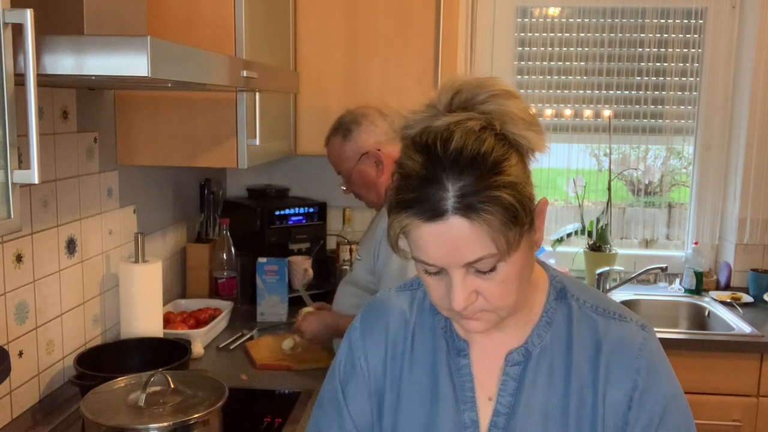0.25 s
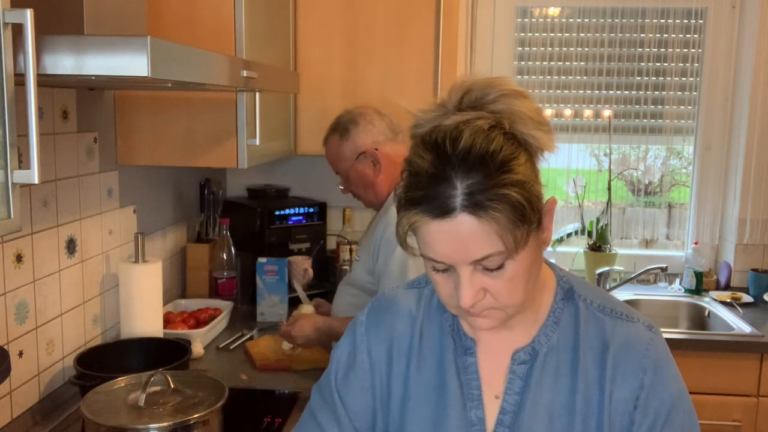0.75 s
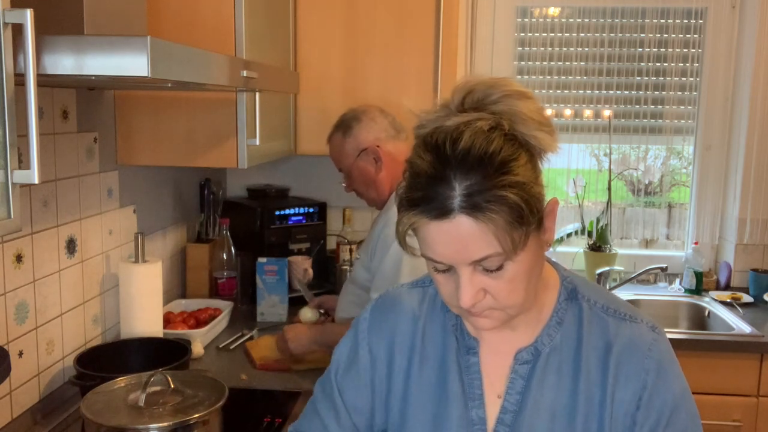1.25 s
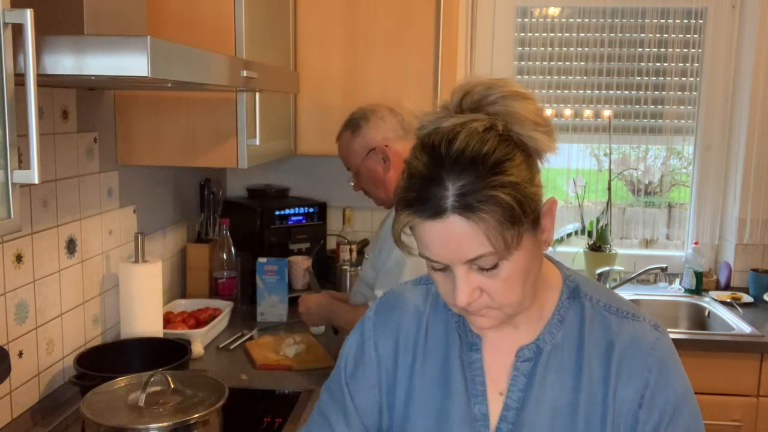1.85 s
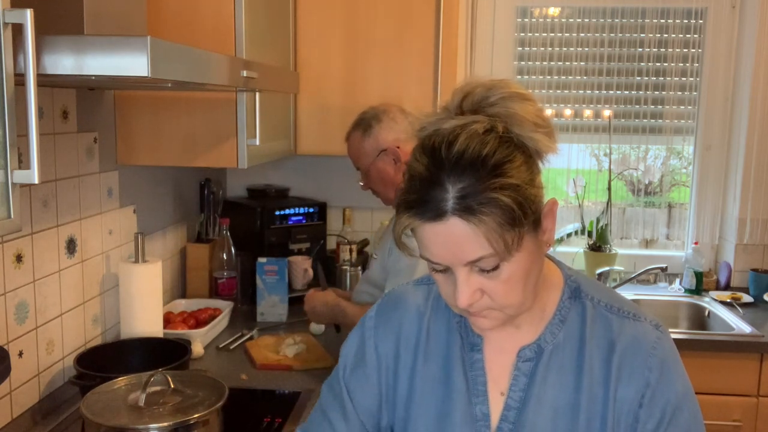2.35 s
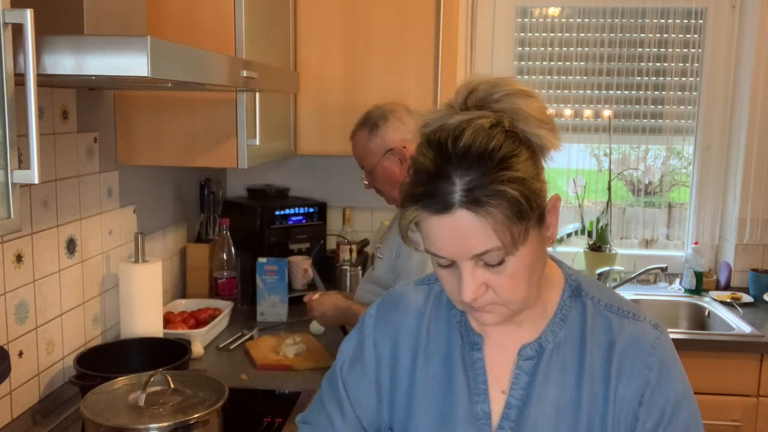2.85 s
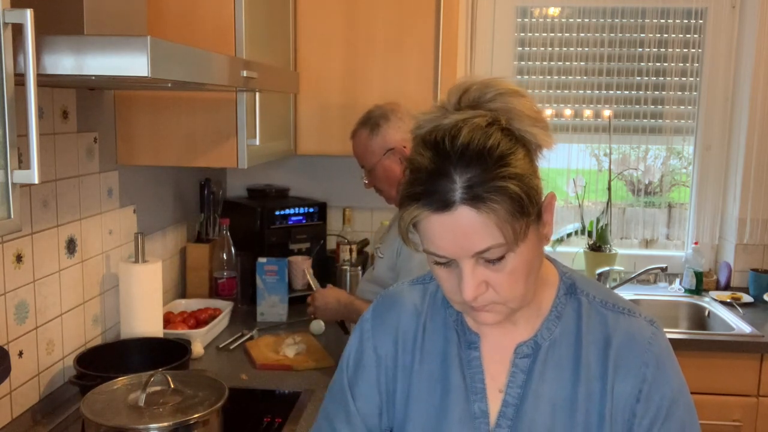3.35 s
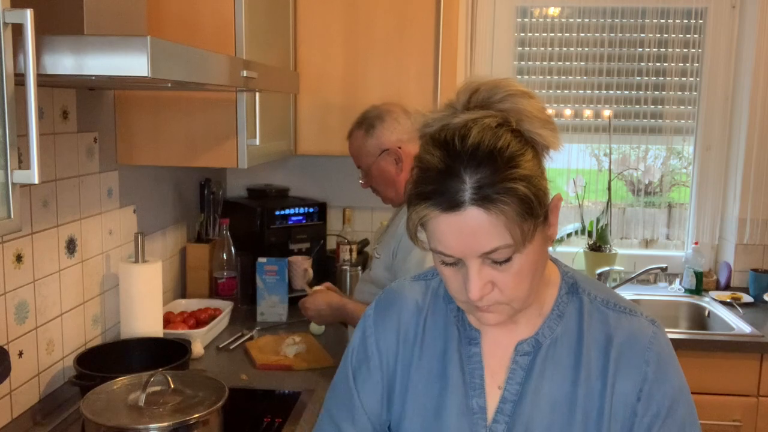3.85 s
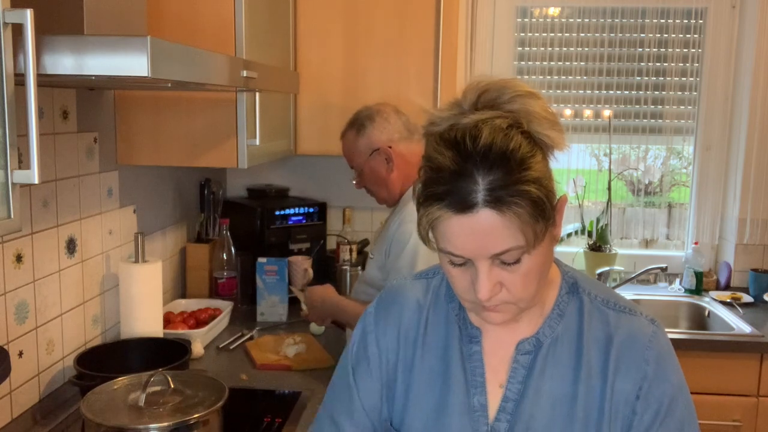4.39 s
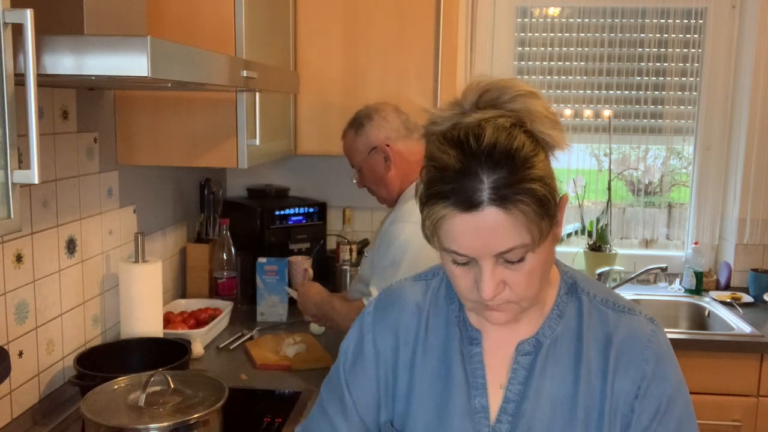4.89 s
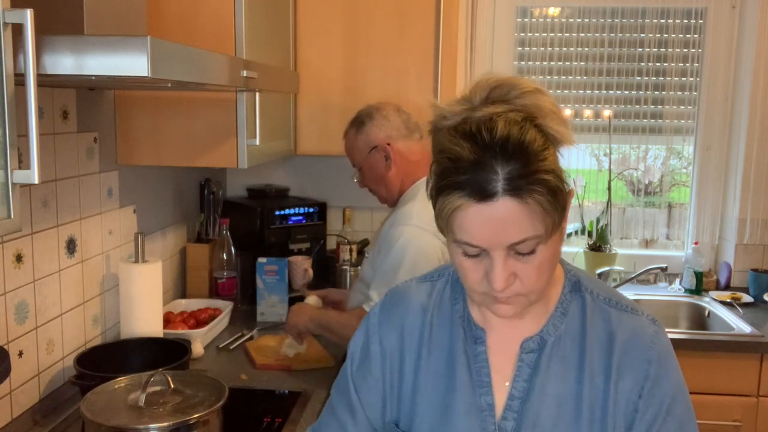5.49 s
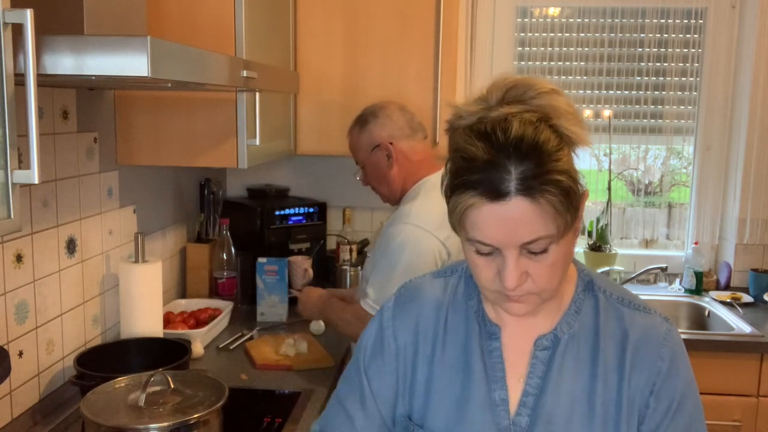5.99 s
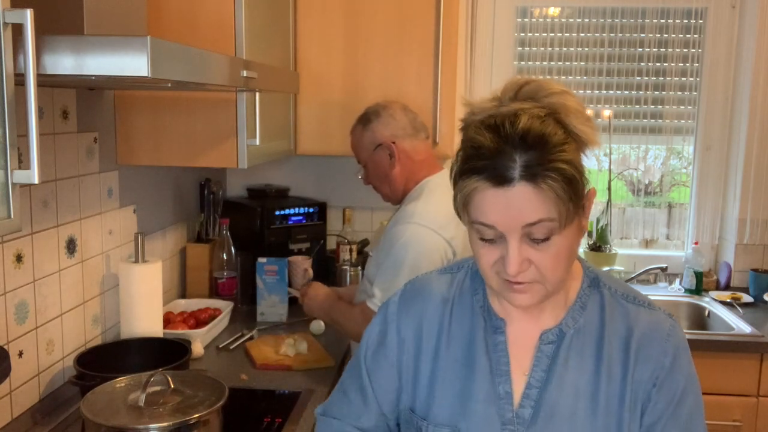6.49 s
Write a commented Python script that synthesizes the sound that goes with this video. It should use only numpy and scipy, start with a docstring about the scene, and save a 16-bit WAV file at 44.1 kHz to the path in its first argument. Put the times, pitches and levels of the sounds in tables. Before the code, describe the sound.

Crisp, juicy slicing of cabbage leaves on a wooden board, with spaced blade knocks, sharp snaps, soft rustles and a late hard clatter on the counter.

```python
"""Cabbage sliced in a tiled kitchen

Cabbage is sliced on a wooden board in a small tiled kitchen, heard in stereo from a couple of metres.
Each stroke is a crowd of random bursts of crisp cells, coloured by filters; sharp ticks are clicks.
Most strokes end with the blade knocking on the board, as coloured pulses and decaying modes.
Hard things clack, mostly near the end, slips squeak, the counter booms, and soft rubbing is shaped noise."""
import sys
import numpy as np
from scipy import signal
from scipy.fft import rfft, irfft, next_fast_len
from scipy.io import wavfile
from scipy.ndimage import uniform_filter1d

SR = 44100
rng = np.random.default_rng(int(sys.argv[2]) if len(sys.argv) > 2 else 0)


def int16_out(signal):
    """Quantize to a 16-bit WAV file."""
    q = np.round(np.clip(np.atleast_2d(signal).T, -1, 1) * 32767)
    wavfile.write(sys.argv[1], SR, q.astype(np.int16))


N = 296793  # length in samples

# Spectra of the cells, the ribs, the juicy fizz and the blade's side: [f/Hz, level per Hz/dB]
CRACKLE_COLOUR = [(500, -28), (1500, -30), (3000, -9), (4800, -3), (6200, 9), (7700, -1), (9300, 1.5),
                  (11000, 1), (15000, -27)]
TEAR_COLOUR = [(150, -12), (350, -11), (600, -7), (900, -1.5), (1250, 4), (1700, 0.5), (2400, 0.5),
               (3500, -2.5), (6000, -4.5), (12000, -38)]
FIZZ_COLOUR = [(3000, -8), (7000, -45), (9500, 9.5), (11500, 6.5), (13500, 1.5), (15500, -9.5)]
RASP_COLOUR = [(800, -26), (1800, -5), (2600, -1.5), (3400, 1.5), (4800, 1.5), (6500, -8.5), (12000, -35)]
CRACKLE_DB, TEAR_DB, FIZZ_DB, RASP_DB = -4, -5, -4.5, -3.5


def slicing():
    """Random fracture: a dense train of impulses, shaped by the strain, excites each material's spectrum."""
    cells = bursts(per_s=2600, spread_db=3.5, clump_db=3.6)
    ribs = bursts(per_s=1100, spread_db=2.6, clump_db=3.2)
    slips = bursts(per_s=900, spread_db=3.0, clump_db=3.5)
    crackle, tear, fizz, rasp = leaf_strain()
    crisp = from_db(CRACKLE_DB) * through(crackle * cells, pulse(CRACKLE_COLOUR))
    dull = from_db(TEAR_DB) * through(tear * ribs, pulse(TEAR_COLOUR))
    fine = from_db(FIZZ_DB) * through(fizz * cells, pulse(FIZZ_COLOUR))
    gritty = from_db(RASP_DB) * through(rasp * slips, pulse(RASP_COLOUR))
    return kitchen(leaf_colours(crisp + dull + gritty) + fine, wet_db=1, echo_db=-5)


def bursts(per_s, spread_db, clump_db, clump_s=.004):
    """Poisson process: cells burst at random, many faint and a few loud, in clumps; rms 1."""
    t, knots = np.arange(N) / SR, np.arange(0, N / SR + 1, clump_s)
    signs = rng.choice([-1, 1], N)
    sizes = signs * from_db(spread_db * np.minimum(rng.exponential(1, N), 4))
    born = rng.random(N) < per_s / SR
    clumps = from_db(clump_db * np.interp(t, knots, rng.standard_normal(len(knots))))
    return rms_one(sizes * born * clumps)


# Strokes of the blade, levels before the gains in slicing():
# [t/s, length/s, crackle level at the end/dB, swell on the way/dB,
#  then relative to the crackle: tearing level/dB, fizz level/dB, rasp level/dB]
STROKES = [(0, .14, -42, 4, -2.5, -2.5, -3), (0.219, 0.071, -41, -4.5, -10.5, -0.5, -7),
           (0.374, 0.2, -34.5, 8, -18, 0, -19), (0.85, 0.059, -47, 2, -4.5, 3, -3),
           (1.343, 0.096, -35.5, 50, 6.5, 4, -2), (1.873, 0.077, -27, 16.5, -8, -1, -26),
           (2.411, 0.11, -37.5, 10, -5, -1, -21), (2.589, 0.11, -37.5, 4, -11, -4.5, -11),
           (3.188, 0.055, -31, 9.5, -2, 0, -3.5), (3.755, 0.097, -28.5, 10.5, -4.5, 0, -6),
           (4.35, 0.1, -29, 16, -1, 0, -19), (4.958, 0.083, -29, 9, -4, -1.5, -14),
           (5.963, 0.18, -35.5, 8.5, 1, 2.5, -2), (6.246, 0.036, -47.5, 0, 0, 7, -18)]
# Soft rustles and swishes of leaves, hands or sleeves:
# [t of the middle/s, half length/s, crackle level/dB, tearing level/dB]
RUSTLES = [(0.366, 0.044, -46, -52), (0.811, 0.018, -54, -47), (1.051, 0.027, -51.5, -44),
           (1.113, 0.079, -53.5, -53), (2.171, 0.05, -57, -49.5), (2.408, 0.014, -51, -43.5),
           (2.942, 0.038, -59, -55), (3.403, 0.13, -59, -47.5), (3.533, 0.035, -64, -52),
           (3.719, 0.084, -47, -45.5), (4.025, 0.057, -49, -43), (5.401, 0.021, -49.5, -43.5),
           (5.543, 0.13, -57.5, -61), (5.68, 0.03, -53, -53), (5.86, 0.031, -58, -40),
           (6.353, 0.059, -60, -42.5), (6.487, 0.087, -40, -47.5), (6.63, 0.017, -51, -44)]
RUSTLE_FIZZ_DB, RUSTLE_RASP_DB = -10.5, -3  # relative to the rustle's crackle
TICK_DECAY_DB_PER_S = 579


def leaf_strain():
    """Superposition: strokes, soft rustles and the tearing behind ticks drive crackle, tear, fizz and rasp."""
    rustle = swells([(middle, half, db) for middle, half, db, _ in RUSTLES])
    tear = swells([(middle, half, db) for middle, half, _, db in RUSTLES])
    times, _, tear_db = np.transpose(TICKS)
    tick_decay = from_db(-TICK_DECAY_DB_PER_S * np.arange(SR // 2) / SR)
    tear = tear + through(clicks(times, tear_db), tick_decay)[0]
    strain = np.array([rustle, tear, rustle * from_db(RUSTLE_FIZZ_DB), rustle * from_db(RUSTLE_RASP_DB)])
    for start, length, db, swell_db, *colour_db in STROKES:
        gains = from_db(db + np.r_[0, colour_db])
        strain = strain + np.outer(gains, stroke(start, length, swell_db))
    return strain


STROKE_ATTACK_S, STROKE_RELEASE_DB_PER_S = 0.0016, 527


def stroke(start, length, swell_db):
    """Exponential envelope: the blade bites, usually meets more leaves as it sinks, and stops."""
    t = np.arange(N) / SR - start
    bite = np.clip(t / STROKE_ATTACK_S, 0, 1)
    still_to_go = np.clip(1 - t / length, 0, 1)
    after_end = np.clip(t - length, 0, 1)
    return bite * from_db(-swell_db * still_to_go - STROKE_RELEASE_DB_PER_S * after_end)


LEAF_S, LEAF_COLOUR_DB = .014, 4.2  # spacing of the leaves, spread of their band gains


def leaf_colours(x, count=9):
    """Time-varying filtering: each leaf that gives way favours other half-octave bands."""
    t, knots = np.arange(N) / SR, np.arange(0, N / SR + 1, LEAF_S)
    lowpassed = []
    for hz in np.geomspace(900, 10000, count - 1):
        lowpassed.append(signal.sosfilt(signal.butter(2, hz, fs=SR, output="sos"), x))
    out, below = 0, 0
    for upto in lowpassed + [x]:
        gains = rms_one(from_db(LEAF_COLOUR_DB * rng.standard_normal(len(knots))))
        out = out + (upto - below) * np.interp(t, knots, gains)
        below = upto
    return out


# Sharp ticks: leaves snapping, and near the end the bright edges of clacks:
# [t/s, tick level/dB, level of the tearing behind it (before TEAR_DB)/dB]
TICKS = [(0.2098, -18, -49), (0.28, -12, -46), (.3005, -14, -58), (0.3884, -20, -32), (.415, -16, -39),
         (.448, -12, -53), (0.475, -8, -50), (.485, -17, -42), (0.5323, -8.5, -46), (.566, -19, -42),
         (.806, -25.5, -81), (0.8676, -18, -35.5), (.941, -20.5, -49), (.964, -33, -57),
         (0.998, -21.5, -59), (1.083, -17, -56), (1.333, -19, -33), (1.368, -18, -33), (1.389, -10, -55),
         (1.7698, -29.5, -46.5), (1.889, -22, -54), (1.911, -17, -60), (1.931, -10, -50), (1.944, -9, -35),
         (2.093, -19, -58), (2.111, -20.5, -69), (2.416, -15.5, -39), (2.441, -11.5, -44),
         (2.447, -24, -46), (2.505, -24, -39), (2.5321, -19, -54), (2.69, -9.5, -36.5), (2.703, -30, -47),
         (3.1204, -23, -44.5), (3.1636, -13.5, -56), (3.748, -12, -55), (3.966, -14, -63),
         (4.088, -28, -57), (4.329, -28.5, -68), (4.362, -13, -40), (4.407, -4.5, -40), (4.568, -16.5, -36),
         (4.915, -29, -48.5), (4.9426, -18.5, -48), (4.983, -15, -29), (5.1671, -15, -33.5),
         (5.64, -36, -49), (5.734, -26.5, -56), (5.7947, -24.5, -59), (5.9851, -13, -35), (6.053, -9, -61),
         (6.2472, -15.5, -54), (6.2777, -15, -46)]
# Spectrum of a tick: [f/Hz, level per Hz/dB]
TICK_COLOUR = [(400, -22), (1200, -9), (3000, -4), (6200, 1), (7800, -4), (9500, -6), (12000, -7),
               (15500, -11)]


def ticks(splinter_db=-8):
    """Impulsive excitation: one sharp tick, with a couple of milliseconds of splintering behind it."""
    times, db, _ = np.transpose(TICKS)
    breaks = clicks(times, db)
    for lag_s in rng.uniform(.0002, .002, (len(times), 3)).T:
        breaks = breaks + clicks(times + lag_s, db + splinter_db)
    return kitchen(through(breaks, pulse(TICK_COLOUR)), wet_db=2, echo_db=-9)


# Blade on board, levels before the gains in knocks():
# [t/s, peak level/dB, hardness of the contact/dB, weight of the blow/dB, pitch of that spot/semitones]
KNOCKS = [(.092, -30, 0, -17, 3), (0.116, -54, 7, -8, 2), (0.256, -34.5, -8, -2, -1.5),
          (0.268, -37, -12, 9.5, 0.5), (.301, -26, -17, -5, 0), (.384, -47, 12, -13, 0.5),
          (0.916, -39, -16, -3, -2.5), (1.453, -12, -12.5, -13, 1.6), (1.976, -13.5, -8, -15.5, 0.8),
          (2.7073, -15.5, -24, -6, 1.06), (3.269, -25, -17, -6, -0.8), (3.7025, -28.5, 3.5, -2.5, 2.5),
          (3.713, -31, -13, 5.5, 2), (3.8693, -17, -20, -5, 0.65), (4.4632, -17.5, -15, -5.5, 0.1),
          (5.061, -23, -18, -14, -0.3), (5.113, -32, -19, -1, -0.5), (5.8723, -25, -11, -1, -0.5),
          (6.169, -26, -9.5, -2.5, 0.6)]
# Spectra of the thock, the bright edge and the thud: [f/Hz, level per Hz/dB]
THOCK_COLOUR = [(50, -26), (130, -27), (280, -13), (370, -1.5), (450, 0.5), (560, 0), (720, 7), (950, 0.5),
                (1300, -5), (2000, -31), (5000, -35)]
EDGE_COLOUR = [(300, -21.5), (700, -5), (1000, 2.5), (1500, 4), (1800, -2), (2200, -17), (4000, -12),
               (12000, -41)]
THUD_COLOUR = [(40, -26), (90, -11.5), (125, -3.5), (190, -6), (270, -2), (340, -10), (430, 5.5),
               (600, 1.5), (1200, -37.5), (4000, -79)]


def knocks():
    """Impact excitation: a thock, an edge set by hardness, a thud set by weight, and the board's modes."""
    times, db, hardness_db, weight_db, pitch = np.transpose(KNOCKS)
    thock = from_db(1.5) * blows(times, db, pitch, THOCK_COLOUR)
    edge = from_db(3.5) * blows(times, db + hardness_db, pitch, EDGE_COLOUR)
    thud = from_db(-1.0) * blows(times, db + weight_db, pitch, THUD_COLOUR)
    ring = from_db(-15) * board_ring(times, db)
    return kitchen(thock + edge + thud, wet_db=4.5, echo_db=-3.0) + ring


# Modes of the board: [f/Hz, level/dB, t60/s]
BOARD_MODES = [(209, -14, .45), (373, -6, .35), (457, -8, .36), (540, -7, .4), (639, -2, .3),
               (683, -2, .26), (728, -8, .26), (775, -6, .26), (916, -0.5, .3), (1038, -2, .3),
               (1160, -7, .3), (1222, -8, .3), (1330, -10, .3), (1421, -10, .3), (1542, -8, .3)]


def board_ring(times, db, spot_db=2.0):
    """Modal excitation: each blow lands on another spot of the board and so favours other modes."""
    modes = np.array([ringing([mode], build_s=0.00018) for mode in BOARD_MODES])
    out = np.zeros((2, N + SR))
    for start, level_db in zip((times * SR).astype(int), db):
        strengths = from_db(level_db + spot_db * rng.standard_normal(len(BOARD_MODES)))
        out[:, start:start + SR] += np.tensordot(strengths, modes, 1)
    return out[:, :N]


# Hard things set down on the counter, levels before the gains in clacks(): [t/s, level/dB, pitch/semitones]
CLACKS = [(3.7042, -37, -2), (5.8615, -16.5, 0.5), (5.873, -37, 0.3), (5.9855, -18, 6.5), (6.05, -33, 2.5)]
# Spectrum of the contact: [f/Hz, level per Hz/dB]
CLACK_COLOUR = [(60, 1), (170, -14), (450, -8.5), (750, -11), (1130, -12), (1500, 2), (1800, 6),
                (2250, 4.5), (2700, 4.5), (3050, -8), (3500, 4), (4200, 0), (4800, -19), (5700, 3.5),
                (6300, -12.5), (6900, -13), (8000, -11), (11000, -13), (14000, -50)]
# Modes of the hard object: [f/Hz, level/dB, t60/s]
HARD_MODES = [(273.5, -1, 0.13), (405, -4, .18), (458, 0, .25), (530, -3, 0.17), (740, 6, 0.09),
              (1780, 2, 0.2), (1933, 0, .22), (2213, 2, 0.28), (2353, -3, 0.25), (2680, -3, 0.2),
              (3330, -7, .1), (3700, -4, .08), (4242, -4, .13), (5163, -14, 0.2), (5652, -13, .2),
              (6008, -12, 0.2)]


def clacks(chatter_db=-12, count=3):
    """Repeated impact: a hard object meets the counter, chatters for a moment and rings in its modes."""
    times, db, pitch = np.transpose(CLACKS)
    ring_db = db - 3 * np.abs(pitch)  # glancing blows ring less
    ring = through(clicks(times, ring_db), ringing(HARD_MODES, build_s=0.002))
    contact = blows(times, db, pitch, CLACK_COLOUR)
    for lag_s in rng.uniform(.002, .022, (len(times), count)).T:
        chatter_pitch = pitch + rng.normal(0, 0.38, len(times))
        contact = contact + blows(times + lag_s, db + chatter_db, chatter_pitch, CLACK_COLOUR)
    heard = kitchen(contact, wet_db=2.5, echo_db=-7)
    return from_db(10.0) * heard + from_db(-12) * ring


# Light taps of the knife's handle, levels before the gain in taps(): [t/s, level/dB]
TAPS = [(3.71, -27), (3.7205, -28), (5.3885, -38), (5.3935, -37), (5.399, -31.5)]
# Modes of the handle: [f/Hz, level/dB, t60/s]
HANDLE_MODES = [(690, -3, .15), (1230, -9, .08), (1365, -2, .09), (1480, -7, .3), (1570, 0, .11),
                (1950, -8, .08), (3176, -14, .05)]


def taps():
    """Modal decay: the handle touches down with a short hollow ring."""
    times, db = np.transpose(TAPS)
    return from_db(-8) * through(clicks(times, db), ringing(HANDLE_MODES, build_s=.0006))


# Squeaks and scrapes of the blade on wet leaves and of things shifting on the counter:
# [t of the middle/s, length/s, f/Hz, level/dB, glide/(octaves per s), roughness from 0 pure to 1.5 rasping]
SQUEAKS = [(.262, .012, 275, -34, -1, .5), (.27, .007, 580, -34, 0, 1), (.396, .01, 1300, -38, 0, 1.5),
           (1.336, .003, 2850, -34, 0, .8), (1.352, .012, 2750, -38, -2, .6),
           (3.413, .011, 1135, -37, -1.5, .15), (3.443, .012, 1090, -45, -2, .3),
           (3.74, .008, 480, -38, 0, .5), (3.776, .013, 462, -33, -.5, .3),
           (4.372, .008, 1750, -37, 0, 1.5), (5.885, .012, 480, -31, -1, .6),
           (5.926, .017, 465, -29, -1, .25)]


def squeaks():
    """Stick-slip oscillation: a short steady or falling tone that wavers in pitch and strength."""
    t, out = np.arange(N) / SR, np.zeros(N)
    for middle, length, hz, db, glide, rough in SQUEAKS:
        near = np.abs(t - middle) < 4 * length
        u = t[near] - middle
        wander = rng.standard_normal((2, len(u)))
        waver, flutter = (rms_one(uniform_filter1d(row, size=90)) for row in wander)
        pitch = hz * 2 ** (glide * u) * (1 + .1 * rough * waver)
        tone = np.sin(2 * np.pi * np.cumsum(pitch) / SR)
        envelope = np.exp(-.5 * (u / length) ** 2)
        strength = (1 + rough * flutter) / np.hypot(1, rough / 2)
        out[near] += from_db(db) * envelope * strength * tone
    return kitchen(out, wet_db=-9, echo_db=-16)


# Pushes on the counter, levels before ring_db: [t/s, level/dB]
PUSHES = [(0.272, -30), (1.455, -52), (1.975, -54), (2.579, -42), (2.724, -43), (3.268, -37.5), (3.37, -45),
          (3.701, -27.5), (3.872, -36.5), (4.438, -30), (4.977, -39.5), (5.17, -50), (5.45, -46.5),
          (5.855, -30.5), (6.158, -38.5)]


def counter(boom_hz=56.8, t60=0.46, ring_db=1):
    """Low-frequency resonance: the hollow counter swells and booms when it is leant on."""
    times, db = np.transpose(PUSHES)
    modes = [(boom_hz, 0, t60), (boom_hz * 1.43, -10, t60 / 2), (127, -10, .3)]
    boom = ringing(modes, build_s=0.014)[0]  # alike in both channels
    return from_db(ring_db) * through(clicks(times, db), boom)


# Hands and cabbage rubbing over the board, and the cabbage rocking: [t of the middle/s, half length/s, level/dB]
RUBS = [(.11, 0.022, -46), (.93, 0.078, -52.5), (1.13, 0.13, -48), (2.61, 0.087, -64), (3.47, 0.13, -48),
        (5.62, 0.23, -62.5), (5.91, 0.081, -40), (6.5, 0.13, -46)]
ROCKS = [(.925, 0.039, -48.5), (2.625, 0.053, -52.5), (3.675, 0.032, -43.5)]
# Spectra of the shuffling hands, the rubs, the rocking and the still air: [f/Hz, level per Hz/dB]
SHUFFLE_COLOUR = [(30, -12.5), (55, 11), (90, 1), (130, -12), (190, -0.5), (290, 1.5), (450, -8),
                  (900, -17), (3000, -53)]
RUB_COLOUR = [(40, -7), (90, 1.5), (140, -3.5), (300, 6), (500, 5), (900, -2), (1500, -1.5), (4000, -61)]
ROCK_COLOUR = [(40, -23), (65, -1), (95, -1), (140, -8), (220, -7.5), (400, -29), (2000, -54)]
AIR_COLOUR = [(25, 9), (55, 11.5), (220, -4), (500, -24), (1200, -26), (3000, -10), (7000, -14.5),
              (16000, -19.5)]
REGRIP_DELAY_S, REGRIP_HALF_S, REGRIP_DB = 0.19, 0.16, -60.5  # delay counts from the end of a stroke
FIDGET_DB, AIR_DB = -62.5, -63.5


def background():
    """Modulated noise: hands regrip after each stroke, cabbage rubs and rocks, over steady room air."""
    grips = [(start + length + REGRIP_DELAY_S, REGRIP_HALF_S, REGRIP_DB) for start, length, *_ in STROKES]
    shuffle = np.hypot(from_db(FIDGET_DB), swells(grips)) * noise(SHUFFLE_COLOUR)
    rubbing = swells(RUBS) * noise(RUB_COLOUR)
    rocking = swells(ROCKS) * noise(ROCK_COLOUR)
    return shuffle + rubbing + rocking + from_db(AIR_DB) * noise(AIR_COLOUR)


def swells(rows):
    """Addition of powers: gain of smooth Gaussian rises and falls, each (middle s, half length s, dB)."""
    t, power = np.arange(0, N / SR, .001), 0
    for middle, half, db in rows:
        power = power + from_db(db) ** 2 * np.exp(-2 * np.minimum(((t - middle) / half) ** 2, 20))
    return np.interp(np.arange(N) / SR, t, np.sqrt(power))


def noise(spectrum):
    """Filtered white noise: independent stereo noise of this colour; rms 1."""
    return through(rng.standard_normal((2, N)), pulse(spectrum))


def clicks(times, db):
    """Impulse train: one impulse per event."""
    out = np.zeros(N)
    out[np.clip(np.round(times * SR).astype(int), 0, N - 1)] = from_db(db)
    return out


def blows(times, db, semitones, spectrum):
    """Frequency scaling: coloured pulses, each at its own pitch, that peak at the given levels."""
    out = np.zeros(N + SR)
    for start, level_db, shift in zip(np.round(times * SR).astype(int), db, semitones):
        shape = pulse([(hz * 2 ** (shift / 12), colour_db) for hz, colour_db in spectrum])
        out[start:start + len(shape)] += from_db(level_db) * shape / np.abs(shape).max()
    return out[:N]


def ringing(modes, build_s):
    """Modal synthesis: decaying sines build up quickly, a quarter cycle apart in the two channels."""
    t, out = np.arange(SR) / SR, 0
    for hz, db, t60 in modes:
        phase = rng.uniform(0, 2 * np.pi) + np.array([[0], [rng.choice([-1, 1]) * np.pi / 2]])
        out = out + from_db(db - 60 * t / t60) * np.sin(2 * np.pi * hz * t + phase)
    return out * (1 - np.exp(-t / build_s))


def pulse(spectrum, size=4096):
    """Minimum phase by the folded cepstrum: the shortest causal pulse of this colour; energy 1."""
    cepstrum = irfft(np.log(from_db(at_hz(spectrum, np.fft.rfftfreq(size, 1 / SR)))))
    cepstrum[1:size // 2] *= 2
    cepstrum[size // 2 + 1:] = 0
    shape = irfft(np.exp(rfft(cepstrum)))
    return shape / np.linalg.norm(shape)


def through(x, response):
    """Convolution: play a signal through a response, one row per channel."""
    return signal.oaconvolve(np.atleast_2d(x), np.atleast_2d(response), axes=1)[:, :N]


def at_hz(points, hz):
    """Logarithmic frequency axis: read a table by interpolation."""
    f, v = np.transpose(points)
    return np.interp(np.log(np.maximum(hz, 1)), np.log(f), v)


def from_db(db):
    """Decibel law: level to amplitude gain."""
    return 10 ** (np.asarray(db) / 20)


def rms_one(x):
    """Normalisation by power: scale to unit rms."""
    return x / np.sqrt(np.mean(x ** 2) + 1e-20)


def evened(x, size):
    """Envelope flattening: level out the swells of a noise over this many samples, keeping its rms."""
    return x * x.std() / np.sqrt(uniform_filter1d(x ** 2, size=size, mode="wrap") + 1e-20)


# Reverberation time of the kitchen: [f/Hz, t60/s]
REVERBERATION = [(60, 0.6), (250, 0.74), (800, 0.59), (2500, 0.62), (6000, 0.49), (10000, 0.3),
                 (16000, 0.039)]
# Reflections off counter, wall and cupboards, before echo_db: [delay t/s, gain]
ECHOES = [(.0013, .8), (.0041, .3), (.0089, .9), (.0153, .4)]


def kitchen(x, wet_db, echo_db, build_s=0.000053, count=14):
    """Room response: direct sound, near reflections and a diffuse tail that dies soonest at the top."""
    t, hz = np.arange(SR) / SR, np.fft.rfftfreq(SR, 1 / SR)
    edges = np.geomspace(60, SR / 2, count)
    white, tail = rfft(rng.standard_normal((2, SR))), 0
    for low, high in zip(np.r_[0, edges[:-1]], edges):
        band = irfft(white * ((hz >= low) & (hz < high)), SR)
        band = evened(band, size=int(3 * SR / high) + SR // 400)
        tail = tail + band * from_db(-60 * t / at_hz(REVERBERATION, (low + high) / 2))
    tail = tail * (1 - np.exp(-t / build_s))
    response = from_db(wet_db) * tail / np.linalg.norm(tail, axis=1, keepdims=True)
    response[[0, 1], [5, 0]] += 1  # the sound reaches the right channel first
    for delay, gain in ECHOES:
        arrival = int(delay * SR) + rng.integers(0, 14, 2)
        response[[0, 1], arrival] += gain * from_db(echo_db)
    return through(x, response)


def scene():
    """Linear superposition: all the work at the counter and the room's air."""
    return slicing() + ticks() + knocks() + clacks() + taps() + squeaks() + counter() + background()


# Stereo width by band: [f/Hz, correlation of left and right from -1 to 1]
CORRELATION = [(55, .5), (130, -.15), (300, -.3), (750, -.05), (1900, .15), (3200, -.1), (5000, -.3),
               (6300, -.15), (7800, -.45), (8500, -.96), (10200, -.96), (11200, .3), (12600, .92)]
# Left minus right: [f/Hz, level/dB]
BALANCE = [(55, 2), (160, 7), (300, 6.5), (600, 2.3), (1200, 1.5), (2300, 4), (5000, 2.3), (9000, -.5)]
RUMBLE_CUT_HZ, CUTOFF_HZ = 38, 15900


def record(dry):
    """Mid-side weighting: left and right are mixed to a set correlation by band; rumble and top are cut."""
    size = next_fast_len(N + SR)
    hz, (left, right) = np.fft.rfftfreq(size, 1 / SR), rfft(dry, size)
    correlation, sides = np.clip(at_hz(CORRELATION, hz), -.98, .98), np.array([[1], [-1]])
    middle = np.sqrt(1 + correlation) * (left + right) / 2
    side = np.sqrt(1 - correlation) * (left - right) / 2
    balance = from_db(sides * at_hz(BALANCE, hz) / 2)
    heard = irfft((middle + sides * side) * balance, size)[:, :N]
    heard = signal.sosfilt(signal.butter(4, RUMBLE_CUT_HZ, "high", fs=SR, output="sos"), heard)
    return signal.sosfilt(signal.ellip(10, .2, 80, CUTOFF_HZ, fs=SR, output="sos"), heard)


dry = scene()
out = record(dry)
int16_out(out)
```